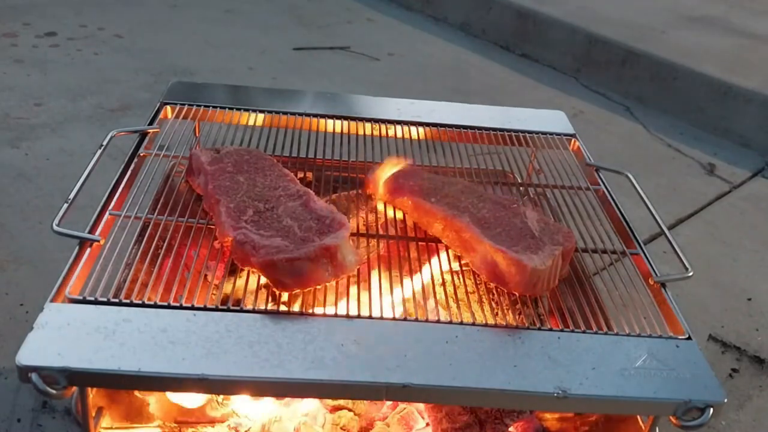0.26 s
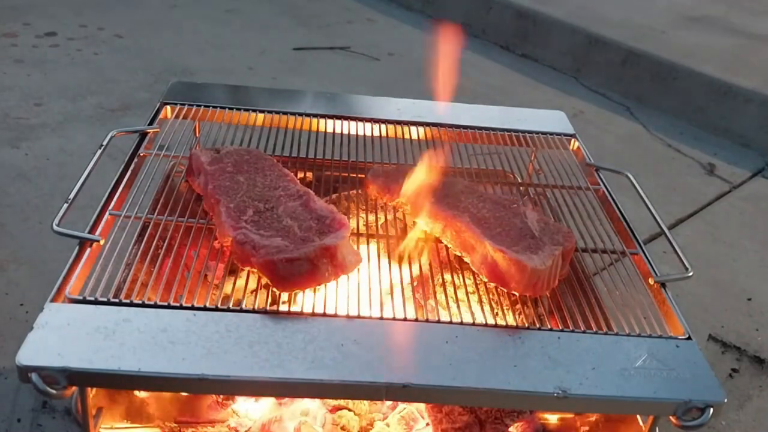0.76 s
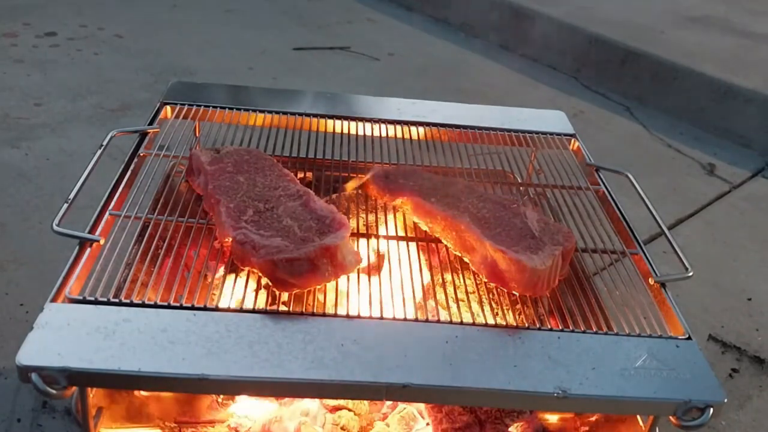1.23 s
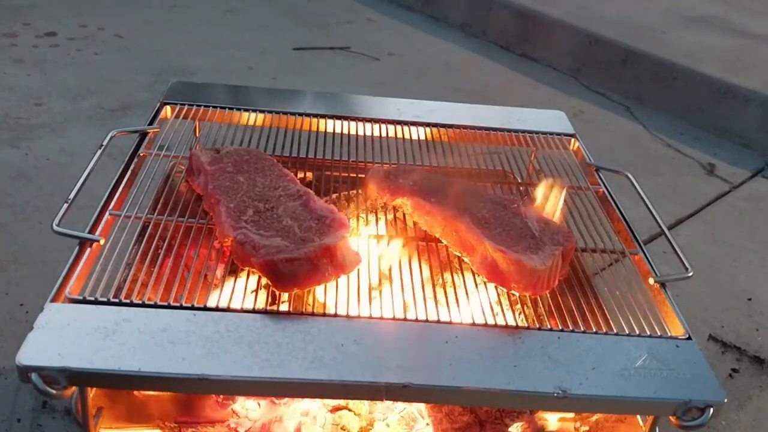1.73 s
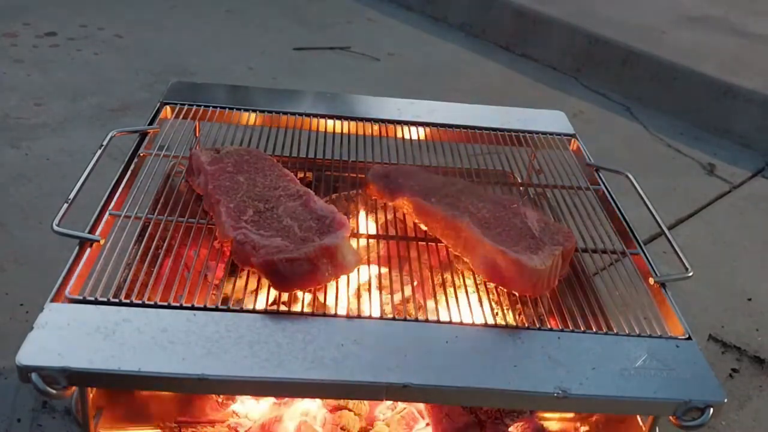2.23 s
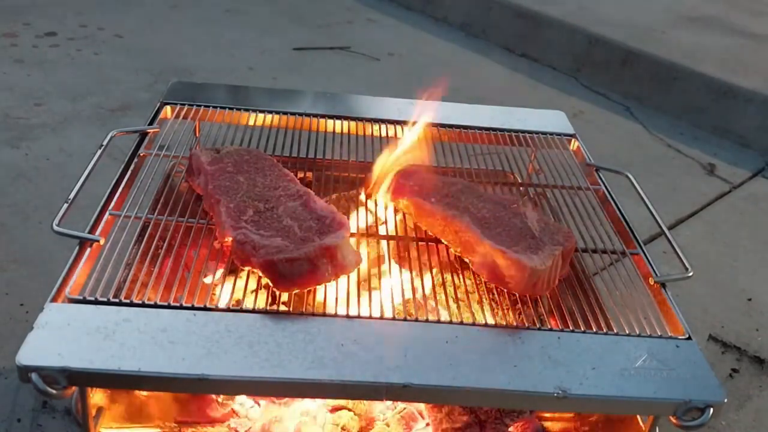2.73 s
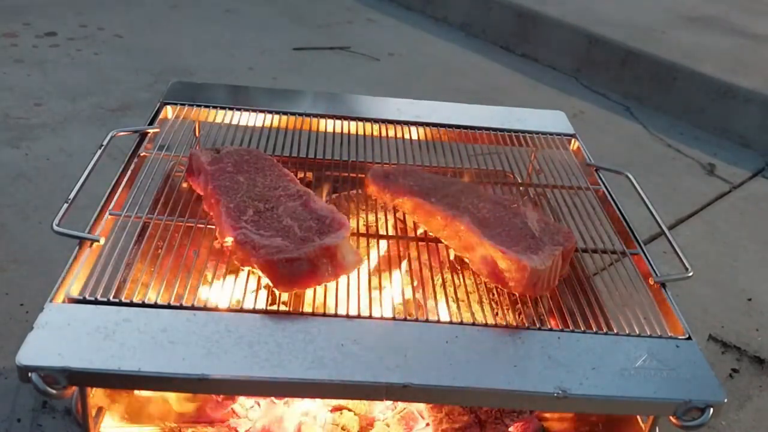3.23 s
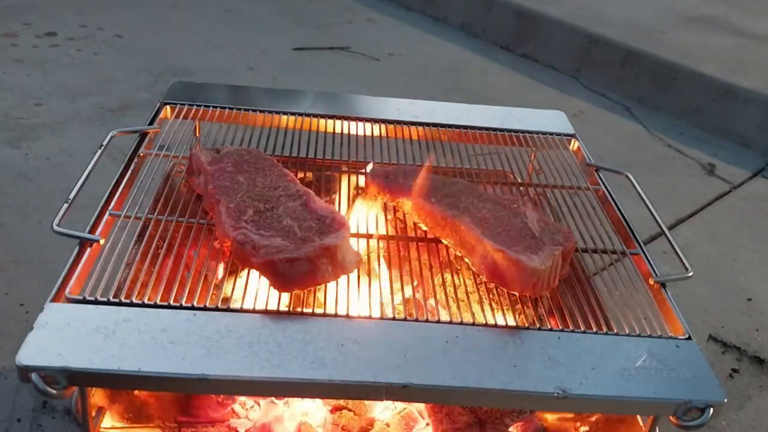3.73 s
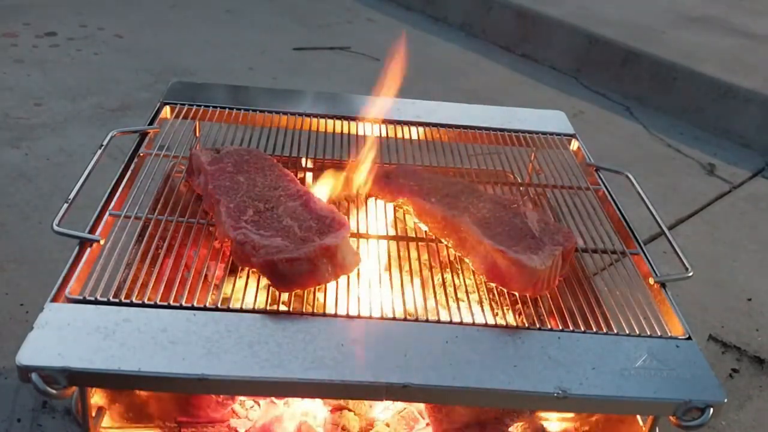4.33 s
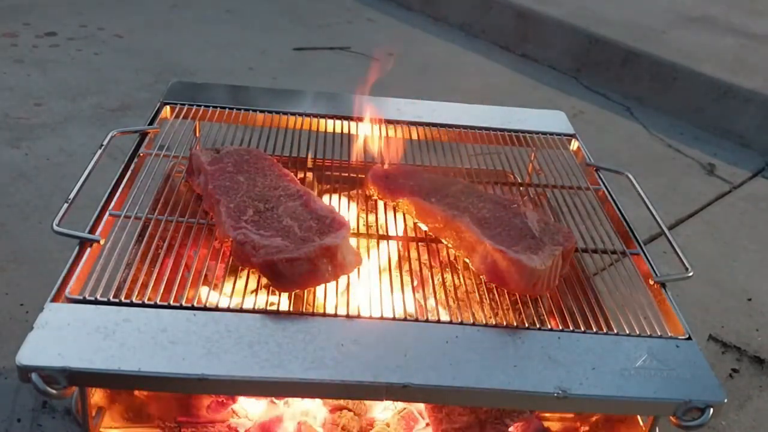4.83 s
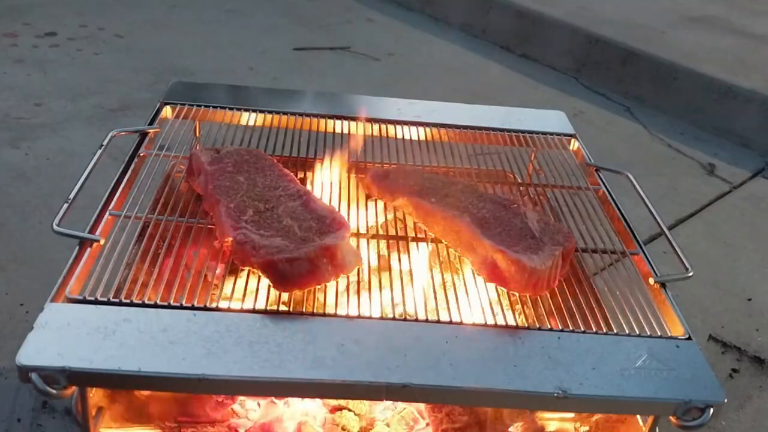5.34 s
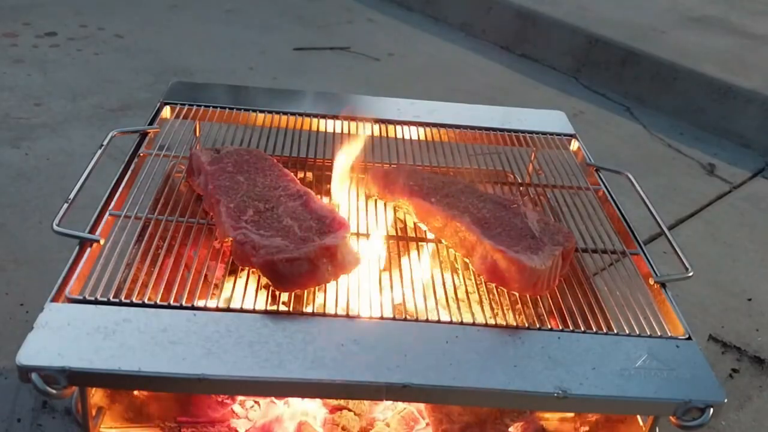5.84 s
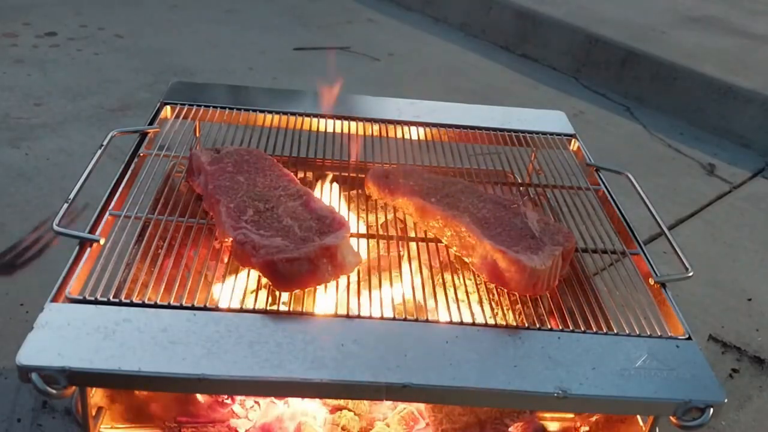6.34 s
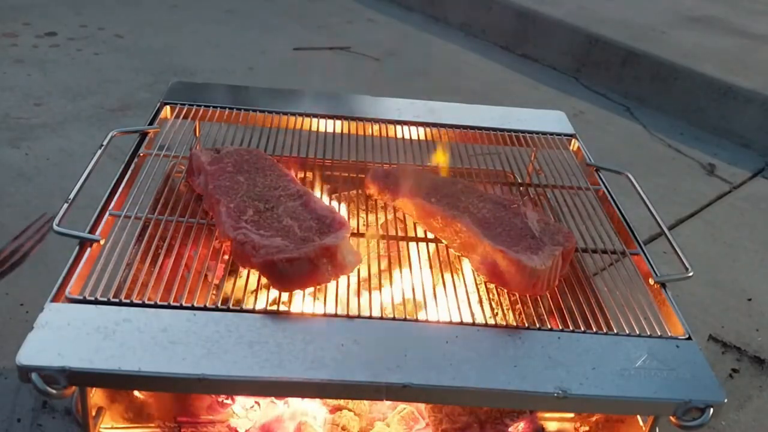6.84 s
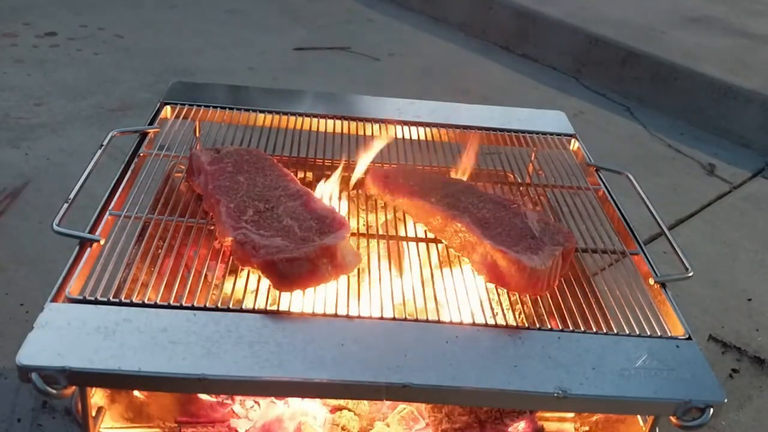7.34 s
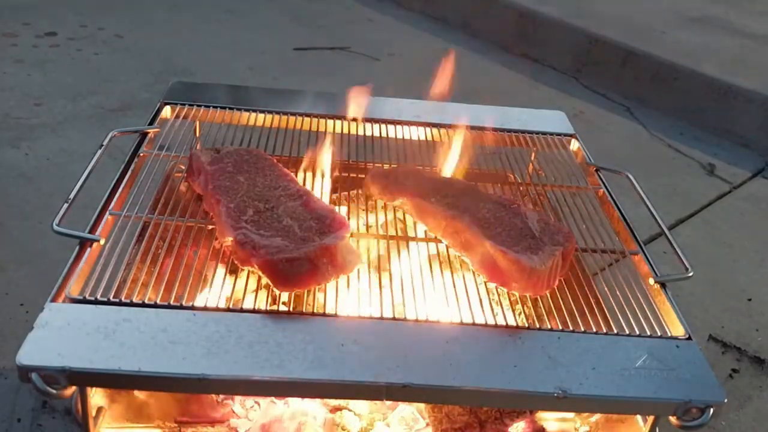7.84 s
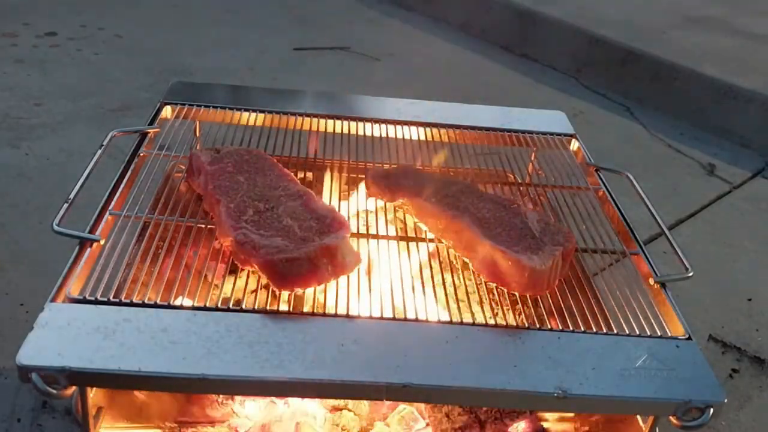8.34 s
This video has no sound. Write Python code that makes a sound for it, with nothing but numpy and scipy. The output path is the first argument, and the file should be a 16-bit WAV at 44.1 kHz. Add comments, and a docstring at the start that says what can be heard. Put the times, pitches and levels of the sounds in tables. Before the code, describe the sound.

Close outdoor grill: bright steady sizzle with crowded crisp snaps, occasional dull ember pops, and a quiet flame rush with faint wavering hum.

```python
"""Grill over a wood fire

Outdoors at a grill grate, heard through two microphone ports that each colour the treble their own way.
Fat sizzles as noise and clumped ticks; spits are sharp snaps with lumpy tails and a steamy hiss.
Embers pop now and then as dull cracks with low puffs. Behind them, flames and far traffic roar softly
as shaped noise, and a few low hums waver as sine tones."""
import sys
import numpy as np
from scipy import signal
from scipy.fft import rfft, irfft, next_fast_len
from scipy.io import wavfile
from scipy.ndimage import uniform_filter1d, map_coordinates

SR = 44100
rng = np.random.default_rng(int(sys.argv[2]) if len(sys.argv) > 2 else 0)


def store_wav(level_fs):
    """Save 16-bit WAV to argv[1]."""
    pcm = np.round(np.clip(np.atleast_2d(level_fs), -1, 1) * 32767)
    wavfile.write(sys.argv[1], SR, pcm.T.astype(np.int16))


def gain_from_decibels(decibels):
    """Convert decibel values to linear amplitude factors."""
    exponent = np.asarray(decibels, float) / 20
    return 10 ** exponent


N = 378378  # samples


def unit(x):
    """Scale to rms 1."""
    return x / np.sqrt(np.mean(x ** 2) + 1e-20)


def along(points, hz):
    """Read (frequency, value) points on a log frequency axis."""
    f, v = np.transpose(points)
    return np.interp(np.log(hz + 1), np.log(f + 1), v)


def curves(rows):
    """One value per sample for each column after the time."""
    s, *columns = np.transpose(rows)
    t = np.arange(N) / SR
    return [np.interp(t, s, column) for column in columns]


def wobble(rate):
    """A smooth random curve with rate knots a second."""
    knots = rng.standard_normal(int(N * rate / SR) + 4)
    return map_coordinates(knots, [np.arange(N) * rate / SR])


def filtered(x, response):
    """Multiply the spectrum of x by a response of frequency."""
    m = next_fast_len(N + 8192)
    return irfft(rfft(x, m) * response(np.fft.rfftfreq(m, 1 / SR)), m)[..., :N]


def causal(x, points):
    """Minimum-phase colour by (frequency [Hz], gain [dB]) points: nothing rings ahead of a click."""
    size = 2048
    cepstrum = irfft(np.log(gain_from_decibels(along(points, np.fft.rfftfreq(size, 1 / SR)))))
    cepstrum[1:size // 2] *= 2
    cepstrum[size // 2 + 1:] = 0
    impulse = irfft(np.exp(rfft(cepstrum)))
    return signal.fftconvolve(x, impulse)[:N]


def high(x, cut_hz):
    """Causal second-order high-pass."""
    return signal.sosfilt(signal.butter(2, cut_hz, "highpass", fs=SR, output="sos"), x)


def energy_one(wave):
    """Scale each burst to energy 1."""
    return wave / np.linalg.norm(wave, axis=-1, keepdims=True)


def bursts(times, gains, snap_s, tail_s, tail_db, lumps_db, size, pulse=2.5):
    """A sharp snap per event, then a lumpy tail of echoes off grate and box, different in each ear.

    Gives one stereo track per set of gains; size is the burst length in samples."""
    count = len(times)
    t = np.arange(size) / SR
    noise = rng.standard_normal((count, 2, 2, size))
    lumps = rng.standard_normal((count, 2, size // 16 + 1))
    lumps = np.repeat(lumps, 16, axis=2)[..., :size]
    # the pressure pulse reaches one port a few samples before the other
    arrival = rng.integers(0, 9, (count, 2, 1))
    snap = energy_one(np.exp(-t / snap_s) * noise[:, 0] + pulse * (np.arange(size) == arrival))
    decay = np.exp(-t / np.reshape(tail_s, (-1, 1, 1)))
    tail = energy_one(gain_from_decibels(lumps_db * lumps) * decay * noise[:, 1])
    wave = energy_one(snap + gain_from_decibels(tail_db).reshape(-1, 1, 1) * tail)
    at = (np.round(times * SR).astype(int)[:, None] + np.arange(size)).ravel()

    def place(gain):
        return [np.bincount(at, (gain[:, ear, None] * wave[:, ear]).ravel(), N + size)[:N]
                for ear in range(2)]

    return np.array([place(gain) for gain in gains])


# Sizzle on the grate: (time [s], upper treble level [dB], lower treble level [dB])
SIZZLE_LEVELS = [(0, -47.5, -58), (1, -48.5, -57), (2.2, -47, -58.5), (2.65, -48.5, -69),
                 (3.2, -47.5, -57.5), (3.9, -50, -61.5), (4.25, -46, -60.5), (4.6, -49, -63.5),
                 (5.1, -46.5, -58.5), (5.45, -47, -64), (6.15, -46, -58), (7, -48, -63), (7.5, -49, -67.5),
                 (8, -46, -58.5), (8.58, -46, -57.5)]


def sizzle():
    """Countless bubbles of steam burst in the fat: a noisy fizz, and sparser ticks in clumps."""
    upper_db, lower_db = curves(SIZZLE_LEVELS)
    swell = gain_from_decibels(1.1 * wobble(14) + 0.28 * wobble(90))
    draw = rng.random((9000, 4))  # one row per tick
    busy = np.cumsum(gain_from_decibels(2 * wobble(40)))  # ticks crowd where this climbs fast
    times = np.interp(draw[:, 0], busy / busy[-1], np.arange(N) / SR)
    size_db = np.minimum(-5 * np.log(draw[:, 1]), 16)  # many small, few large
    pan_db = 2.8 * np.outer(draw[:, 2] - .5, [1, -1])
    gains = gain_from_decibels(size_db[:, None] + pan_db)
    tilt = gain_from_decibels(3.2 * (draw[:, 3:] - .5))  # some ticks lean bright, others dull
    bright, dull = bursts(times, [gains * tilt, gains / tilt], snap_s=0.00023, tail_s=0.0021,
                          tail_db=-2.3, lumps_db=2.3, size=200)

    def fizz():
        return unit(swell * rng.standard_normal((2, N)))

    upper = high(fizz() + gain_from_decibels(0.5) * unit(bright), 4770)
    lower = high(fizz() + gain_from_decibels(14) * unit(dull), 2260)
    lower = lower - high(lower, 3660)
    return gain_from_decibels(upper_db) * upper + gain_from_decibels(lower_db) * lower


# Spits of fat on the grate, strong and faint: (time [s], upper treble energy [dB],
# lower treble energy [dB], tail against snap [dB], left over right [dB])
TIMED_SPITS = [(0.0462, -24, -14, -10, 1), (0.0747, -10, -11, 2, 0.0), (0.1349, -18, -5.5, 7, 1),
               (0.1491, -17.0, -9, 6, 1), (0.151, -11, -17, 4.0, 8), (0.4106, -13, -14, 7, 7),
               (0.436, -23.0, -16, -8.0, -2.0), (0.4563, -19, -15.0, 0, -1.0), (0.5356, -12, -9, -6, 3),
               (0.6017, -11, -23, -4, 3), (0.6434, -3.5, -24, -1, 6), (0.6571, -7, -8, 4, 0),
               (0.7145, -12, -19, 7.0, 4), (0.7484, -16, -13, 13, -4), (0.7695, -17, -17, -2, -2.0),
               (0.8279, -20.0, -13.0, -11, 0.0), (0.8477, -17, -15, 0, 1), (0.8572, -21, -11, -2, 0),
               (0.9151, -17, -20, 0, 0), (0.936, -23, -18, -2, -1), (1.1106, -26, -35, 0, -3),
               (1.2899, -11.0, -30, 11, -3), (1.3944, -23, -12, -14, 4.0), (1.4689, -18, -12, -12, -4),
               (1.4732, -13.5, -25, 2.0, -2.0), (1.5285, -17, -19, 4.0, -6), (1.5753, -6, -9, 14, 3),
               (1.5809, -20, -12, -4, 0), (1.6788, -20, -13, 0, -1), (1.7177, -17.0, -22, -11, -3.0),
               (1.7301, -27, -16.5, 12, -11), (1.8151, -9.5, -15, 1, 3), (1.8438, -25, -7.5, -5, -1),
               (1.9857, -11, -14, 6, 1.0), (2.0142, -4.5, -8, 3, 4), (2.0225, -14.0, -28, -2.0, -3.0),
               (2.1149, -14, -12, 8.0, 3), (2.2009, -16.0, -19, -7, -3), (2.2173, -15, -17, -1.0, 7),
               (2.2217, -12, -9, -5.0, 1.0), (2.2578, 0.5, -9, 1, 1), (2.2597, -16, -22, 4, 0.0),
               (2.2683, -11, -14, -6, -3.0), (2.3237, -21, -14, 1, -2), (2.328, -5, -14, -8, -5),
               (2.407, -0.5, -10, -11, -1), (2.4088, -24, -22, 10.0, 0), (2.4145, -10, -9, -5, 8),
               (2.4302, -6, -15, 2, -2), (2.5803, -11, -21, -5, 3), (2.6772, -12, -21, 10.0, 9),
               (2.6926, -11, -17, 10, 4), (2.7205, -4, -18, -1, 1), (2.7249, -11, -28, 11, 2),
               (2.8244, -7.5, -21, 2, 2), (2.9167, -22, -28, -13.0, -4.0), (2.9359, -10, -18, 7, 6),
               (2.9777, -18, -17, -9, -5.0), (2.981, -24, -5, 12, -2), (2.9829, -23, -10, 7, 3),
               (3.0032, -8, -1.5, 11, 2), (3.0054, -2.5, -19, 11, -1.0), (3.0117, -21, -23, 6.0, 8.0),
               (3.0205, -9, -16, 12, 2), (3.023, -20, -19, -2, 3), (3.0719, -10, -24.0, 10.0, 1.0),
               (3.0774, -13, -14, 1, 1.0), (3.1118, -16, -13, 3, 2), (3.1482, -15, -17, 8, 12),
               (3.1876, -14, -22, 0, 6), (3.2524, -16, -23, 0, -1), (3.2769, -21, -24, 0, 1),
               (3.3397, -19, -14, 2, 10), (3.4202, -13, -9, 12, 4), (3.4361, -12.5, -19, 10.0, -2.0),
               (3.5065, -11, -22.0, -2, 0.0), (3.5176, -14.0, -13, -6, 0), (3.5303, -9, -13, 4, 7),
               (3.5476, -15, -10, 10.0, -2), (3.6139, 2.5, -3, -8, -2.5), (3.6185, -14, -15, 10.0, -1),
               (3.6225, -12, -22, 8.0, 1), (3.641, -11, -4.5, 6, -3), (3.6621, -13, -22, 4.0, 2),
               (3.6993, -13, -18, 5.0, 0.0), (3.709, -23, -11, -12, 0.0), (3.8086, -17.0, -14, 13, -2.0),
               (3.8459, -6.5, -3.5, 1, 2), (3.9607, -29, -14, -13.0, 0.0), (3.9813, -16, -7, 2, -3.0),
               (4.0115, -15.0, -16, 10.0, -1.0), (4.0235, -9, -24, 1, 3), (4.0517, -14, -28, -2.0, -2),
               (4.0798, -16.5, -15, -14, 8), (4.1856, -8.5, -15, 8, 4), (4.2555, -14, -14, -3.0, -2.0),
               (4.2659, -13, -13, 10.0, -2), (4.2809, -11, -16, -2.0, -1), (4.322, -16, -10, -16, 1),
               (4.4046, -19, -14, 3.0, -3), (4.4075, -11, -14, 0.0, 5), (4.4371, -8, -4, -10, 0),
               (4.4618, -18, -14, 2, 0), (4.5257, -14, -16, 9, 3), (4.6614, -22, -30, -3, 1),
               (4.6743, -19, -20, 2, -6), (4.6943, -14, -14, 5, -1), (4.7197, -18, -30, -4, -1),
               (4.7387, -13, -11, 4, 2), (4.7911, -19, -27, 2, 0), (4.8484, -23, -25, 0, 0),
               (4.8679, -20, -16, -3, 0), (4.8912, -17, -17, -9, 10), (4.9221, -19, -10.5, 15, -4),
               (5.024, -23, -23, 0, 0), (5.0465, -15, -19, 2, 0), (5.0784, -16, -22, 0, 2),
               (5.0906, -6, -19, 6, 2), (5.1163, -14, -22, -2, -1), (5.1363, -17, -26, 0, 0),
               (5.1483, -12, -28, -8, -2.0), (5.2173, -1, -15, 19, 1), (5.2671, -13, -24.0, -10.0, -3.0),
               (5.2871, -29, -13, 9, 8), (5.3201, -14, -11, 9, -6), (5.5154, -7, -14, 0, 4),
               (5.518, -19, -21, 7.0, 2.0), (5.6082, -9.5, -29, -1, -5.0), (5.6831, -2, -14.5, -11, 2),
               (5.693, -21.0, -8.5, 5.0, -2), (5.6957, -16, -17, -12, -6.0), (5.7819, -17, -11, -4.0, -3),
               (5.7836, -9.5, -17, 7, -2), (5.8279, -1.5, -9, 2, -3.0), (5.8307, -2, -5.5, -1, 4),
               (5.839, -12, -17, -9, -2.0), (5.9216, -6, -28, 9.0, 1.0), (5.9492, -16, -13.5, -3.0, 8),
               (6.0653, -13, -17, 1.0, -4), (6.1777, -6, -19, -4, 5), (6.2088, -6, -27, 4, 4),
               (6.2109, -22, -13, 18, -1.0), (6.2604, -12, -11, 12, 2.0), (6.345, -25, -25, 0, 0),
               (6.4606, -12, -11.5, -1, 5), (6.4934, -11, -17, 0, -10), (6.5411, -18, -26, 0, -3),
               (6.5894, -19, -18, -2, -1), (6.7783, -16, -21, -2.0, -7), (6.8, -29, -11.5, 5, 8),
               (6.8859, -8, -19.0, -9, -5), (6.899, -12, -24, 8, -3.0), (6.9139, -7, -15, -15, -1),
               (6.9331, -15, -15, -4.0, -4), (6.9826, -17, -30, 8, -1), (7.0319, -24, -32, 0, -1),
               (7.0966, -23, -12, -3, 2), (7.1115, -11, -10.5, 1, -4), (7.1507, -14, -24, -2, 0),
               (7.1654, -17, -15, 2, 2.0), (7.1751, -13, -26, 1, 3.0), (7.208, -8.5, -11, -6, 1),
               (7.2504, -18, -23, -2, -1), (7.3026, -16, -26, 9.0, -1.0), (7.3225, -18, -14, 7, -3),
               (7.4049, -28, -31, -12.0, -5), (7.421, -21, -36, -3, -7), (7.5947, -18, -25, 5, 0),
               (7.6141, -18, -21, -4, 1), (7.6905, -8.5, -32, -21, -4), (7.7501, -11, -7, 1, 4),
               (7.8663, -9, -14, 0, 0), (7.8814, -8, -18, 14, 0), (7.922, -13, -20, 8, -3),
               (7.9478, -17.0, -28, -15, -9.0), (8.0082, -17, -10, 1, -4), (8.0518, -16.0, -22, -1, -10),
               (8.1302, -14.0, -19, -1, -2.0), (8.2685, -6, -27, -4, -4), (8.2704, -14, -29, 4, 2.0),
               (8.3118, -16, -10.5, -4, 1), (8.3451, -16.0, -14, 5, -3.0), (8.4173, -8, -25, 5, 0.0),
               (8.452, -3.5, -12, 4, -1), (8.4551, -18, -12, -3, -7)]


def spits():
    """Each fat spit has its own treble balance; further middling spits fall at chance moments."""
    extra_count = 100
    # upper treble energy, lower treble energy, tail against snap [dB]
    middle_db, range_db = np.array((-13, -23.5, 12)), np.array((7, 6, 2))
    extra = middle_db + range_db * (rng.random((extra_count, 3)) - .5)
    extra_s = rng.random(extra_count) * N / SR
    extra_pan_db = 10 + 2.5 * rng.standard_normal(extra_count)  # mostly on the left
    extra = np.column_stack([extra_s, extra, extra_pan_db])
    s, upper_db, lower_db, tail_db, pan_db = np.vstack([TIMED_SPITS, extra]).T
    sides = gain_from_decibels(.5 * np.outer(pan_db, [1, -1]))
    gains = gain_from_decibels([lower_db, upper_db])[..., None] * sides
    snap = bursts(s, gains, snap_s=0.00053, tail_s=0.0026, tail_db=tail_db, lumps_db=3.2,
                  size=500, pulse=9.8)
    # steam escapes after each spit
    hiss = bursts(s, gain_from_decibels(-13) * gains, snap_s=0.0024, tail_s=0.026, tail_db=15, lumps_db=8.7,
                  size=1800, pulse=0)
    lower, upper = snap + hiss
    lower = high(lower, 2060)
    return lower - high(lower, 4600) + high(upper, 6500)


# Dull pops of the embers: (time [s], crack energy [dB], puff energy [dB])
EMBER_POPS = [(0.046, -18, -10), (0.1993, -17, 2), (0.217, -6, 3.5), (1.3772, -22, -11), (2.3271, -23, -1),
              (2.9807, 0.5, -10), (3.003, -17, -10), (3.2394, -19, -1.5), (3.5473, -2.5, 1),
              (3.6144, -4, -7), (3.6413, -13, -13), (3.7078, -7, -11), (5.2734, -11, 3), (5.2867, -3, 0.5),
              (5.6828, -4, -7), (5.83, 5, -4), (6.2464, -1, 0), (6.452, -6, -12), (6.4606, -6, -8),
              (7.4048, -12, -12), (7.9728, -17, -4), (8.4078, -11, 5.5), (8.4514, 0, 5)]
# Colour of a pop's crack: (frequency [Hz], gain [dB])
CRACK_COLOUR = [(60, -47), (500, -13), (1000, -0.5), (2000, 1), (3000, -5), (6000, -39)]
# Colour of a pop's low push: (frequency [Hz], gain [dB])
PUFF_COLOUR = [(30, -53), (120, -14), (250, 2.5), (600, 1), (1000, -5), (2500, -36)]


def embers():
    """Gas pockets burst in the wood: a dull crack and a slower low puff."""
    s, crack_db, puff_db = np.transpose(EMBER_POPS)

    def play(level_db, tail_s, tail_db):
        gains = gain_from_decibels(level_db)[:, None] * np.ones(2)
        return bursts(s, [gains], 0.00041, tail_s, tail_db, lumps_db=7.2, size=2400, pulse=1.7)[0]

    cracks = play(crack_db, 0.004, 1.9)
    puffs = play(puff_db, 0.0084, 3.6)
    return np.array([causal(crack, CRACK_COLOUR) + causal(puff, PUFF_COLOUR)
                     for crack, puff in zip(cracks, puffs)])


# Likeness of the two ears in the roar: (frequency [Hz], left-right correlation, clipped to -1..1)
EAR_LIKENESS = [(60, 0.88), (150, 0.94), (300, 0.81), (640, 0.063), (1300, -0.2), (2400, 0.65),
                (3400, 0.87), (6000, -2.9)]


def shaped_noise(spectrum, patchy_db):
    """Stereo noise of rms 1 with patches of random gain; mid and side set how alike the ears are."""
    z = signal.stft(rng.standard_normal((2, N)), nperseg=512)[2]
    field = uniform_filter1d(rng.standard_normal(z.shape[1:]), size=6, axis=0)
    field = uniform_filter1d(field, size=12, axis=1)
    pair = signal.istft(z * gain_from_decibels(patchy_db * unit(field)), nperseg=512)[1][:, :N]

    def mid_side_response(hz):
        turn = np.arccos(np.clip(along(EAR_LIKENESS, hz), -1, 1)) / 2
        return gain_from_decibels(along(spectrum, hz)) * [np.cos(turn), np.sin(turn)]

    mid, side = filtered(pair, mid_side_response)
    return unit(np.array([mid + side, mid - side]))


# Shape of the low rumble: (frequency [Hz], relative density [dB per Hz])
RUMBLE_SPECTRUM = [(15, -60), (25, -65), (46, -8.5), (91, -1.5), (119, 2.5), (136, -4), (152, -2.5),
                   (177, -7.5), (220, -4), (450, -26), (580, -35), (990, -120)]
# Shape of the rush above it: (frequency [Hz], relative density [dB per Hz])
RUSH_SPECTRUM = [(180, 4), (300, -9.5), (377, -5), (813, -0.5), (1720, -6), (2430, -14), (2740, -13.5),
                 (3050, -18.5), (4000, -12.5), (5200, -67), (8800, -120)]
# The rush swells and sinks: (time [s], level [dB])
RUSH_SWELL = [(0, -43), (1, -42.5), (1.8, -42), (2.3, -45), (3.05, -42.5), (3.9, -44.5), (4.6, -43),
              (5.4, -43), (6.5, -43), (7, -44), (7.9, -42.5), (8.58, -42.5)]


def roar():
    """Flames and far traffic: a low rumble and a rush above it, both fluttering with the flames."""
    flutter_db = 0.39 * wobble(9)
    rumble_level = gain_from_decibels(-39.5 + 0.39 * flutter_db)
    rumble = rumble_level * shaped_noise(RUMBLE_SPECTRUM, patchy_db=-0.15)
    rush_level = gain_from_decibels(curves(RUSH_SWELL)[0] + flutter_db + 0.77 * wobble(30))
    return rumble + rush_level * shaped_noise(RUSH_SPECTRUM, patchy_db=0.36)


# The main hum: (time [s], frequency [Hz], level [dB])
MAIN_HUM = [(0, 127.6, -42), (1.4, 129.4, -57), (1.7, 130.1, -42), (2.2, 129.9, -47.5), (2.5, 129.3, -63),
            (2.9, 129.9, -39.5), (3.5, 129.5, -42.5), (3.8, 128.3, -56), (4.3, 127.7, -47.5),
            (4.9, 128.2, -45), (5.4, 128.3, -40), (6.6, 128.8, -37), (7, 128.5, -42.5), (7.5, 128.1, -44.5),
            (8, 129, -38), (8.58, 129.7, -41.5)]
# Weaker tones that come and go: (start [s], end [s], frequency [Hz], level [dB])
WEAK_TONES = [(0, 1.294, 123.1, -44.5), (0, .5, 167.4, -47.5), (2.204, 2.8, 174.8, -55),
              (3.397, 4.901, 180, -51), (3.903, 4.193, 123, -43), (5.7, 6.35, 118.2, -41),
              (5.9, 7.897, 236.7, -57.5), (6.05, 6.404, 158.3, -49), (6.352, 6.75, 177, -48.5),
              (6.8, 7.401, 116.6, -42), (6.799, 8.101, 160.6, -46), (7.4, 7.9, 175.3, -50.5),
              (7.75, 8.6, 117.6, -42), (7.949, 8.603, 233.6, -47)]


def hums():
    """Low sine tones, alike in both ears, that swell, fade and waver slightly in level and phase."""
    t = np.arange(N) / SR
    fade_s = 0.17

    def tone(cycles):
        level = gain_from_decibels(0.44 * wobble(5.4)) * np.sqrt(2)
        return level * np.sin(2 * np.pi * (cycles + rng.random()) + 0.14 * wobble(7.1))

    hz, db = curves(MAIN_HUM)
    out = gain_from_decibels(db) * tone(np.cumsum(hz) / SR)
    for start, end, hz, db in WEAK_TONES:
        # each fade is centred on its start or end time
        fade = np.clip(np.minimum(t - start, end - t) / fade_s + .5, 0, 1)
        out += gain_from_decibels(db) * fade * tone(hz * t)
    return out


def scene():
    """Everything at the grill, near and far, as it reaches the two ports."""
    return sizzle() + spits() + embers() + roar() + hums()


# Colour of the left microphone port: (frequency [Hz], gain [dB])
LEFT_COLOUR = [(50, -1.5), (130, -1), (600, 0.4), (3000, -3), (4300, 2.5), (5900, 7.5), (7400, 0.5),
               (9500, -5.5), (10500, 0), (12500, 2), (13600, 9), (15700, -9.5)]
# Colour of the right microphone port: (frequency [Hz], gain [dB])
RIGHT_COLOUR = [(50, 1), (130, -0.07), (600, 3), (3000, -2.5), (4300, 5), (5800, 4.5), (7400, 7), (8600, 3),
                (10000, 6.5), (11700, 12), (13000, 10), (14000, 0), (15700, 8)]


def microphone_ports(dry):
    """Each port has its own resonances and loses the deepest bass."""
    ports = np.array([causal(dry[0], LEFT_COLOUR), causal(dry[1], RIGHT_COLOUR)])
    return high(ports, 57)


def top_cut(x):
    """Nothing passes above the cut-off."""
    return signal.sosfilt(signal.butter(12, 15800, fs=SR, output="sos"), x)


def record(dry):
    """The scene through the microphone ports, as a finished stereo mix."""
    mix = microphone_ports(dry)
    return top_cut(mix)


dry = scene()
out = record(dry)
store_wav(out)
```